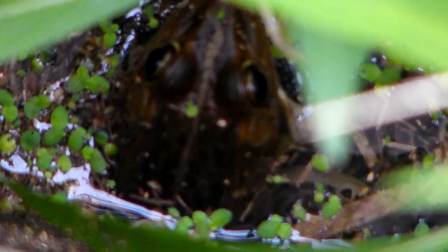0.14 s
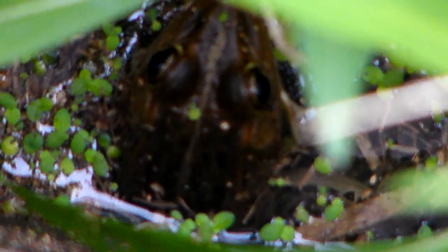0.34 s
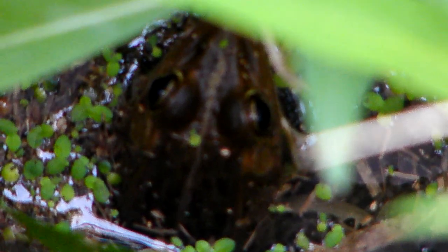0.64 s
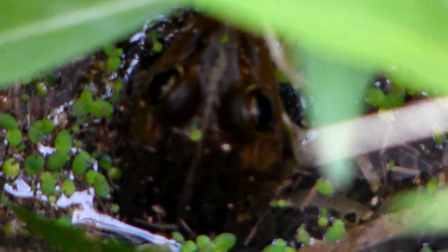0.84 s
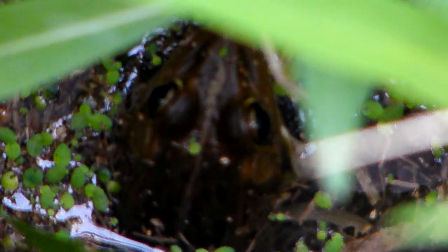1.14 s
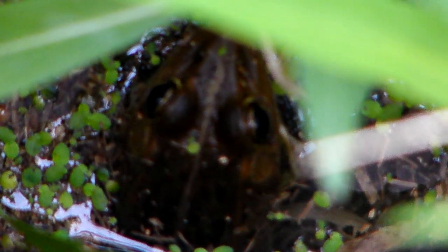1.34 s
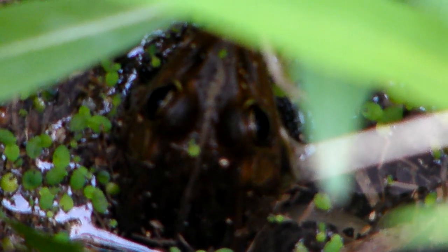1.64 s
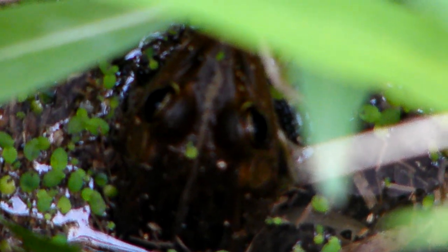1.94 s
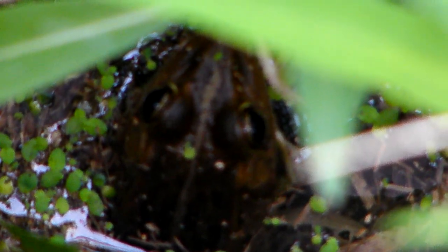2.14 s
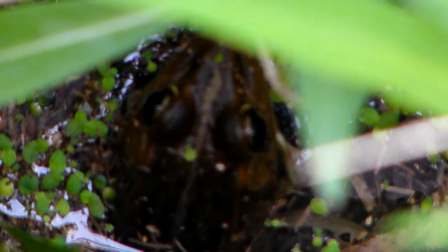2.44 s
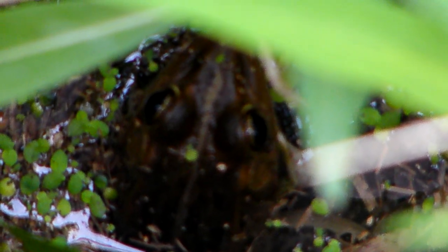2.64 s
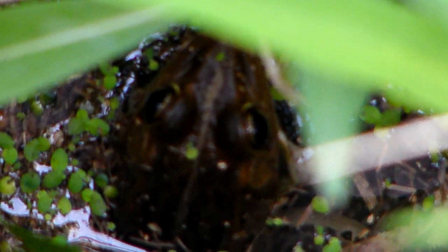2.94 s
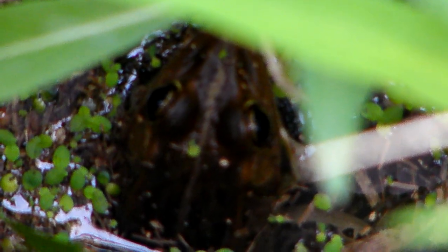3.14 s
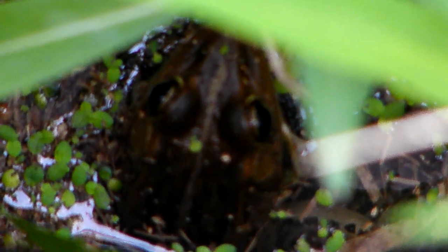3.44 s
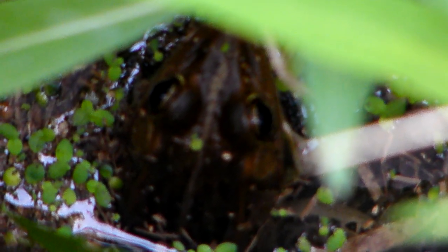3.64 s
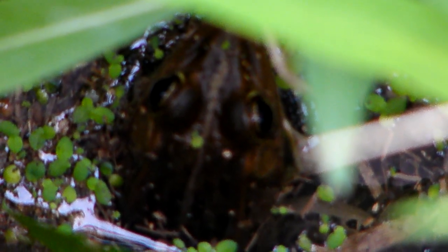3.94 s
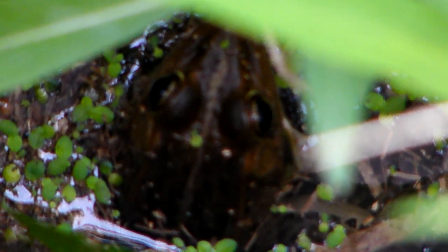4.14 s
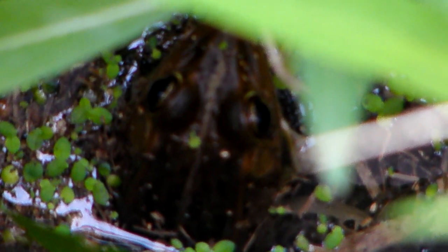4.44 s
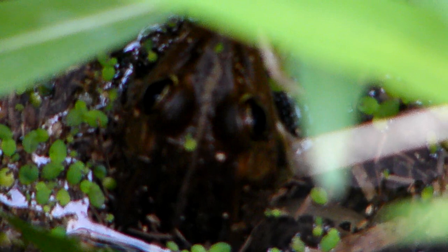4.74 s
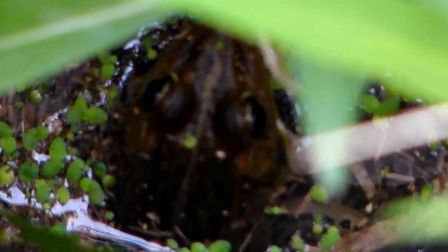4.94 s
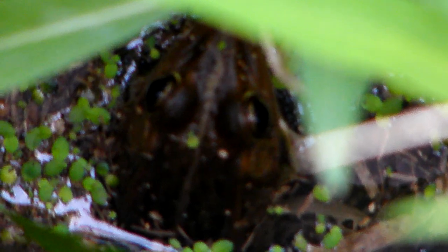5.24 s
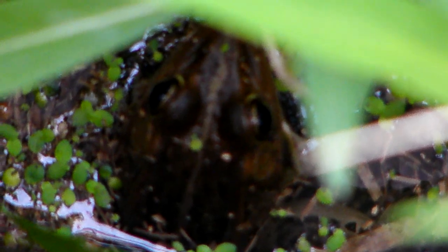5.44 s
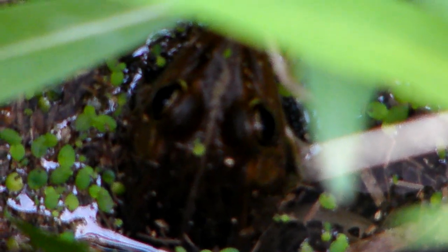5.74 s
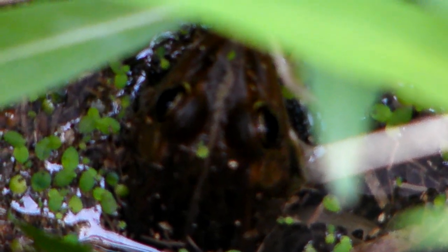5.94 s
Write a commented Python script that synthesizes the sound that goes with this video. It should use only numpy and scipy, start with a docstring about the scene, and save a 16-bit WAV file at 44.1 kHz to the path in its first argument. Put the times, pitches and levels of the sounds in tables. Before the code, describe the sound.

A calm outdoor hush, low and soft with a very faint high hiss, runs throughout the six seconds. Faint, scratchy falling bird chips appear at about 0.4 and 1.0 seconds and now and then afterwards. From 0.8 to 1.3 seconds a distant frog croaks in a swelling row of short, rounded, clicking notes with a little open-air echo. At 1.6 a frog very close to the microphone begins: weak dry ticks quickly become loud, nasal, ringing pulses, about nine until 2.2. A second, shorter and slightly louder croak of seven pulses follows from 2.4 to 2.9, leaving a faint echo. The far frog croaks again from 3.2 to 3.7. Then a small bird repeats a thin, high three-note phrase until about 5.7, among chips and a high whistle near 3.3. Two soft, low whistles and a faint hazy swell come near 5.9.

```python
"""A soft outdoor hush opens a quiet pond: wandering filtered noise, a swelling haze and a faint hiss near 4 kHz.
Gliding tones make faint, scratchy bird chips from early on; a far frog then croaks in slowing click trains.
Close to the microphone a frog croaks twice, its larynx clicks ringing the body, mouth and filling vocal sacs.
The far frog croaks again, and a small bird repeats a three-note phrase among chips and lone whistles."""
import sys
import numpy as np
from scipy import signal
from scipy.fft import rfft, irfft
from scipy.io import wavfile
from scipy.ndimage import uniform_filter1d

SR = 44100
rng = np.random.default_rng(int(sys.argv[2]) if len(sys.argv) > 2 else 0)


def put_to_file(sound):
    """Save the sound as 16-bit audio at rate SR, in the file named by the first command-line argument."""
    columns = np.atleast_2d(sound).T  # one column per channel
    safe = np.clip(columns, -1, 1)
    whole_steps = np.round(safe * 32767)
    wavfile.write(sys.argv[1], SR, whole_steps.astype(np.int16))


N = 268392
TIME = np.arange(N) / SR

# colour of the hush: (frequency [Hz], relative level per Hz [dB])
HUSH_COLOUR = [(30, -45.5), (60, -23), (120, -8.5), (215, -1), (310, -4.5), (430, -1.5), (750, -8),
               (1150, -10.5), (2000, -18.5), (3200, -22.5), (4700, -25.5), (6500, -30), (7800, -46),
               (9700, -37)]
# width of the hush: (frequency [Hz], side minus mid [dB])
HUSH_WIDTH = [(60, -18), (170, -28.5), (290, -19), (1000, -16.5), (2300, -11), (4000, -2.5), (6500, -6.5)]
# colour of a blurred, frog-coloured haze: (frequency [Hz], relative level [dB])
HAZE_COLOUR = [(400, -33.5), (700, -7.5), (880, 8), (1080, -1), (1350, -8.5), (1900, -17), (2300, -5.5),
               (2520, -5), (2900, -22.5), (3300, -6.5), (3700, -33), (5000, -37), (7000, -44.5)]
# swells of that haze, lingering reverberation of the far frog, then a fainter frog:
# (time of the peak [s], half-length [s], level [dB])
HAZE_RISES = [(1.35, 0.23, -66.5), (3.85, 0.66, -69.5), (5.92, 0.53, -64.5)]
# scratchy bird chips: (time [s], level [dB])
BIRD_CHIPS = [(0.353, -56), (1.026, -60.5), (1.535, -59.5), (3.085, -61), (4.234, -61.5), (5.487, -59.5)]
# lone whistles of other birds: (time [s], length [s], start pitch [Hz], end pitch [Hz], level [dB])
LONE_WHISTLES = [(3.333, .075, 6440, 7160, -77), (5.921, 0.0295, 1670, 2100, -59),
                 (5.936, 0.029, 1490, 1320, -54.5)]
# a small bird's repeated phrase: (time [s], level [dB])
PHRASE_TIMES = [(3.699, -69), (4.055, -70), (4.411, -69), (4.775, -65.5), (5.155, -67.5), (5.545, -72)]
# whistles of that phrase: (time into it [s], length [s], start pitch [Hz], end pitch [Hz], relative level [dB])
PHRASE_NOTES = [(0, 0.068, 4520, 4980, -2.5), (0.069, 0.027, 3770, 3920, -1), (.113, .058, 4080, 4260, 0)]
# far frog's croaks: (time of the first note's closing click [s], notes [count, rounded], peak [dB], swell [dB])
FAR_CROAKS = [(.846, 8, -42.5, 14.5), (3.180, 9.1, -37.5, 5.5)]
# far frog's throat resonances: (frequency [Hz], width of each of two passes [Hz], relative level [dB])
FAR_THROAT = [(940, 325, 3), (2523, 380, -5.5), (3390, 170, -14.5), (4300, 800, -22.5)]
# near frog's croaks: (start [s], end [s], slackness of the vocal sacs at the start [0-1])
NEAR_CROAKS = [(1.62, 2.24, 0.8), (2.41, 2.865, .35)]
# near frog's notes: (time of the closing click [s], clicks [count], closing gap [ms], level [dB])
NEAR_NOTES = [(1.6342, 3, 6.4, -38.5), (1.7115, 9, 6.1, -27), (1.7862, 12, 5.23, -24),
              (1.8567, 10, 4.8, -20), (1.9232, 9, 4.17, -18), (1.9976, 9, 5.5, -17.5), (2.071, 9, 5.5, -18),
              (2.141, 9, 4.78, -18), (2.2191, 12, 5.9, -18), (2.4431, 8, 8.2, -25.5), (2.5008, 8, 4.9, -19),
              (2.5742, 9, 5.2, -16.5), (2.6431, 9, 4.6, -15), (2.7106, 9, 4.8, -14.5),
              (2.7802, 10, 5.7, -14), (2.8495, 10, 4.4, -15.5)]
# lone clicks as the larynx falls shut: (time [s], level [dB])
SHUTTING_CLICKS = [(1.9361, -21), (2.2336, -20.5), (2.7214, -16), (2.8619, -17)]
# basic colour of one larynx click: (frequency [Hz], relative level [dB])
CLICK_COLOUR = [(30, -37.5), (120, -28), (400, -24), (550, -2), (1000, -4), (1400, -1.5), (2150, -1),
                (2600, -8), (3100, -11.5), (3700, -10.5), (4200, -24.5), (5200, -28.5), (6400, -41),
                (7800, -62)]
# thin overtones, pitched as at the end of a croak: (frequency [Hz], relative level [dB])
THIN_OVERTONES = [(4580, 4.5), (5800, 15)]
# width of a close source at the microphone ports: (frequency [Hz], side minus mid [dB])
PORT_WIDTH = [(100, -15.5), (300, -16), (550, -42), (2200, -32.5), (3800, -13.5), (6500, -6.5)]

HUSH_DB, HAZE_DB, HISS_BAND_DB = -59.5, -80.5, -81.5
CHIP_S, CHIP_START_HZ, CHIP_END_HZ = .05, 4260, 3030
FAR_NOTE_S, FAR_TOP_HZ = .0635, 5000  # pace of the notes; distance dulls them
FAR_FADE_DB = 7  # the last note trails off
QUICK_GAP_MS = 2.8  # between the first clicks of a near note
BODY_HZ, BODY_WIDTH_HZ, BODY_DB = 582, 75, 7.5  # level with the larynx fully open
MOUTH_HZ, MOUTH_WIDTH_HZ, MOUTH_DB = 4650, 250, 8.5  # level with the larynx fully open
SAC_FILL_S, SAC_FILL_SHAPE = .18, 1.6
SAC_TAUT_HZ, SAC_SLACK_HZ, SAC_WIDTH_HZ = 2294, 1518, 140  # width when taut
SAC_TAUT_DB, SAC_SLACK_DB = 16.5, -7.5
LATE_DAMPING_DB = 8  # the sacs ring less once a note is over
FULL_EFFORT_DB, TREBLE_DB, TREBLE_PER_DB = -11.5, 7, 0.98  # louder notes are brighter
OVERTONE_WIDTH_HZ = 170
OVERTONE_FALL_PER_S = 0.54  # fall per second of croaking, as a share of the pitch at the croak's end
TOP_HZ = 10500


def undb(db):
    """Turn decibels into gain."""
    return 10 ** (np.asarray(db) / 20)


def unit(x):
    """Scale to rms 1."""
    return x / np.sqrt(np.mean(x ** 2))


def add(track, s, sound):
    """Mix a sound into a track at time s."""
    i = int(s * SR)
    track[i:i + len(sound)] += sound[:N - i]


def gains(points, size):
    """Gain of a (Hz, dB) spectrum at each bin of a transform."""
    hz, db = np.transpose(points)
    bins_hz = np.fft.rfftfreq(size, 1 / SR)
    return undb(np.interp(np.log(bins_hz + 1), np.log(hz), db))


def shade(x, points):
    """Filter a full-length sound by a (Hz, dB) spectrum."""
    return irfft(rfft(x) * gains(points, N), N)


def noise(points):
    """Noise with the given spectrum, rms 1."""
    return unit(shade(rng.standard_normal(N), points))


def resonate(x, hz, width_hz):
    """One resonance, gain 1 at its centre."""
    return signal.lfilter(*signal.iirpeak(hz, hz / width_hz, fs=SR), x)


def walk(rate):
    """Slow random wander with a spread near 1."""
    hold = int(SR / rate)
    steps = np.repeat(rng.standard_normal(N // hold + 1), hold)
    smooth = uniform_filter1d(uniform_filter1d(steps, hold), hold)
    return unit(smooth)[:N]


def background():
    """A low outdoor hush, a frog-coloured haze of noise that swells, and a faint, wavering hiss around 4 kHz."""
    mid = noise(HUSH_COLOUR) * undb(0.73 * walk(4.8))
    side = shade(noise(HUSH_COLOUR), HUSH_WIDTH)
    hush = undb(HUSH_DB) * np.array([mid + side, mid - side])
    swells = sum(undb(db) * np.exp(-((TIME - s) / half_s) ** 2) for s, half_s, db in HAZE_RISES)
    haze = noise(HAZE_COLOUR) * (undb(HAZE_DB) + swells) * undb(2 * walk(25))
    band = unit(resonate(resonate(rng.standard_normal(N), 4170, 310), 4170, 310))
    band = band * undb(HISS_BAND_DB + 3.9 * walk(22))
    return hush + haze + band


def chirp(hz):
    """A pure tone that follows a pitch path and fades in and out."""
    tone = np.sin(2 * np.pi * np.cumsum(hz) / SR)
    return tone * np.sin(np.linspace(0, np.pi, len(hz)))


def whistle(length, start_hz, end_hz):
    """A thin whistle that glides and levels off."""
    u = np.linspace(0, 1, int(length * SR))
    return chirp(end_hz + (start_hz - end_hz) * (1 - u) ** 2)


def birds():
    """Scratchy falling chips with a fast warble, a repeated three-note phrase and a few lone whistles."""
    out = np.zeros(N)
    for s, db in BIRD_CHIPS:
        u = np.linspace(0, 1, int(CHIP_S * SR))
        warble = 330 * np.sin(2 * np.pi * (5 * u + rng.random()))
        scratch = 110 * walk(600)[:len(u)]
        fall = CHIP_START_HZ + (CHIP_END_HZ - CHIP_START_HZ) * u
        add(out, s, undb(db) * chirp(fall + warble + scratch))
    for s, phrase_db in PHRASE_TIMES:
        for after, length, start_hz, end_hz, db in PHRASE_NOTES:
            vary = 1 + .006 * rng.standard_normal()
            add(out, s + after, undb(phrase_db + db) * whistle(length, start_hz * vary, end_hz * vary))
    for s, length, start_hz, end_hz, db in LONE_WHISTLES:
        add(out, s, undb(db) * whistle(length, start_hz, end_hz))
    return out


def click_train(count, quick_ms, closing_ms, slowing, swell_db, scatter_db):
    """Clicks that swell and slow down: seconds before the closing click, progress 0-1 and size of each."""
    chance = rng.standard_normal((count, 2))
    # counted back from the closing click, which has the longest gap before it
    gaps_ms = quick_ms + (closing_ms - quick_ms) / np.arange(1, count) ** slowing
    gaps_ms = gaps_ms * (1 + .014 * chance[1:, 0])
    before = np.append(0, np.cumsum(gaps_ms)) / 1000
    progress = np.linspace(1, 0, count)
    # pressure peaks just past the middle of the note, then eases
    swell = -swell_db * np.maximum(1 - progress / .6, 0) ** 1.4
    easing = -5 * np.maximum(progress - .6, 0)
    return before, progress, undb(swell + easing + scatter_db * chance[:, 1])


def far_frog():
    """Evenly paced notes that swell over a croak, with round clicks ringing a distant throat."""
    out, tick = np.zeros(N), signal.unit_impulse(1024)
    click = sum(undb(db) * resonate(resonate(tick, hz, width), hz, width) for hz, width, db in FAR_THROAT)
    click = signal.sosfilt(signal.butter(4, FAR_TOP_HZ, fs=SR, output="sos"), click)
    click = click / np.abs(click).max()
    for start, notes, peak_db, swell_db in FAR_CROAKS:
        levels = peak_db - swell_db * np.linspace(1, 0, int(round(notes))) ** 3
        levels[-1] -= FAR_FADE_DB
        for k, db in enumerate(levels):
            before, _, sizes = click_train(count=10, quick_ms=3.2, closing_ms=9, slowing=1.5,
                                           swell_db=17, scatter_db=1.8)
            for lead, size in zip(before, sizes):
                add(out, start + k * FAR_NOTE_S - lead, undb(db) * size * click)
    return out


def click_shape(points, size=1024):
    """The most abrupt (minimum-phase) click that has the given spectrum, peak 1."""
    # folding the cepstrum forward packs the energy at the onset
    cepstrum = irfft(np.log(gains(points, size)))
    cepstrum[1:size // 2] *= 2
    cepstrum[size // 2 + 1:] = 0
    shape = irfft(np.exp(rfft(cepstrum)))
    return shape / np.abs(shape).max()


def throat(click, opening, sac_hz, sac_db):
    """A click rings the body and mouth, more so as the larynx opens, and the vocal sacs."""
    x = np.pad(click, (0, len(click)))
    thin = signal.sosfilt(signal.butter(1, 1500, "high", fs=SR, output="sos"), x)
    x = opening * x + (1 - opening) * thin
    x = x + undb(BODY_DB) * opening * resonate(x, BODY_HZ, BODY_WIDTH_HZ)
    x = x + undb(MOUTH_DB) * opening * resonate(x, MOUTH_HZ, MOUTH_WIDTH_HZ)
    # slack sacs ring low and broadly, taut ones high and narrowly
    width_hz = SAC_WIDTH_HZ + 1.071 * max(2200 - sac_hz, 0)
    return x + undb(sac_db) * resonate(x, sac_hz, width_hz)


def croak_state(s):
    """The sacs fill as a croak goes on, ringing higher and louder: pitch, ring level and seconds left."""
    start, end, slack = min(NEAR_CROAKS, key=lambda croak: abs(s - (croak[0] + croak[1]) / 2))
    slack = slack * np.exp(-(max(s - start, 0) / SAC_FILL_S) ** SAC_FILL_SHAPE)
    sac_hz = SAC_TAUT_HZ + slack * (SAC_SLACK_HZ - SAC_TAUT_HZ)
    sac_db = SAC_TAUT_DB + slack * (SAC_SLACK_DB - SAC_TAUT_DB)
    return sac_hz, sac_db, end - s


def coloured_click(bright_db, above_hz):
    """A larynx click brightened above a frequency, where no two have quite the same colour."""
    rasp_db = 2.4 * rng.standard_normal(len(CLICK_COLOUR))
    points = []
    for (hz, level), rasp in zip(CLICK_COLOUR, rasp_db):
        points.append((hz, level + (bright_db + rasp) * (hz > above_hz)))
    return click_shape(points)


def near_frog():
    """Two croaks; the sacs fill over the first notes, so dry ticks turn into a ringing quack."""
    out = np.zeros(N)
    for s, count, closing_ms, db in NEAR_NOTES:
        sac_hz, sac_db, left_s = croak_state(s)
        treble_db = TREBLE_DB + TREBLE_PER_DB * (db - FULL_EFFORT_DB)
        train = click_train(int(round(count)), QUICK_GAP_MS, closing_ms, slowing=1.3,
                            swell_db=22.5, scatter_db=2.6)
        for before, progress, size in zip(*train):
            # the first, tight clicks of a note are the brightest
            click = coloured_click(treble_db + 10 * (.55 - progress), sac_hz)
            # the sacs tighten as the note fills them
            pitch = sac_hz * (1 + .035 * (progress - .6) + .01 * rng.standard_normal())
            ring = throat(click, progress ** 0.69, pitch, sac_db)
            # thin overtones sag as the pressure is spent, within the note and over the croak
            sag = (1 + OVERTONE_FALL_PER_S * left_s) * (1 + 0.093 * (.5 - progress))
            for overtone_hz, overtone_db in THIN_OVERTONES:
                ring = ring + undb(overtone_db) * resonate(ring, overtone_hz * sag, OVERTONE_WIDTH_HZ)
            add(out, s - before, undb(db) * size * ring)
    for s, db in SHUTTING_CLICKS:
        sac_hz, sac_db, _ = croak_state(s)
        ring = throat(click_shape(CLICK_COLOUR), 0.93, sac_hz, sac_db - LATE_DAMPING_DB)
        add(out, s, undb(db) * ring)
    return out


def scatter(x, delay_s, t60, top_hz, spread):
    """Diffuse stereo reflections that start after a delay and fall 60 dB in t60 seconds."""
    t = TIME[:2 * SR]
    tail = rng.standard_normal((2, len(t))) * np.exp(-np.log(1000) * t / t60)
    tail = signal.sosfilt(signal.butter(2, top_hz, fs=SR, output="sos"), tail)
    tail = tail / np.sqrt(np.sum(tail[0] ** 2))
    tail = np.pad(tail, ((0, 0), (int(delay_s * SR), 0)))
    mid, side = signal.fftconvolve(x[None], tail, axes=1)[:, :N]
    return np.array([mid + spread * side, mid - spread * side])


def scene():
    """The near frog is almost dry; reeds, the far bank and trees throw back faint echoes."""
    hush, song, answer, near = background(), birds(), far_frog(), near_frog()
    left_right = np.array([[1], [-1]])
    canopy = undb(-11.0) * scatter(song, delay_s=0.01, t60=0.66, top_hz=6500, spread=.4)
    far_echo = undb(-13) * scatter(answer, delay_s=.02, t60=1.1, top_hz=5000, spread=.2)
    # close by, the two microphone ports hear the treble out of step
    ports = left_right * irfft(1j * rfft(near) * gains(PORT_WIDTH, N), N)
    reeds = undb(-17.0) * scatter(near, delay_s=.003, t60=0.04, top_hz=6220, spread=0.16)
    bank = undb(-41) * scatter(near, delay_s=.04, t60=0.098, top_hz=3510, spread=0.17)
    trees = undb(-31) * scatter(near, delay_s=.06, t60=1.64, top_hz=2830, spread=0.11)
    mix = hush + song + canopy + answer + far_echo + near + ports + reeds + bank + trees
    return undb(0.22 * left_right) * mix  # leans slightly left


def record(dry):
    """A steep low-pass cuts the top of the treble."""
    return signal.sosfilt(signal.ellip(8, .2, 70, TOP_HZ, fs=SR, output="sos"), dry)


dry = scene()
out = record(dry)
put_to_file(out)
```